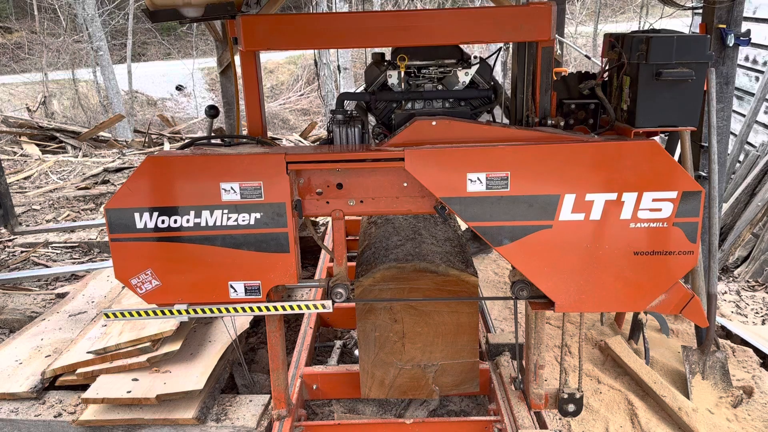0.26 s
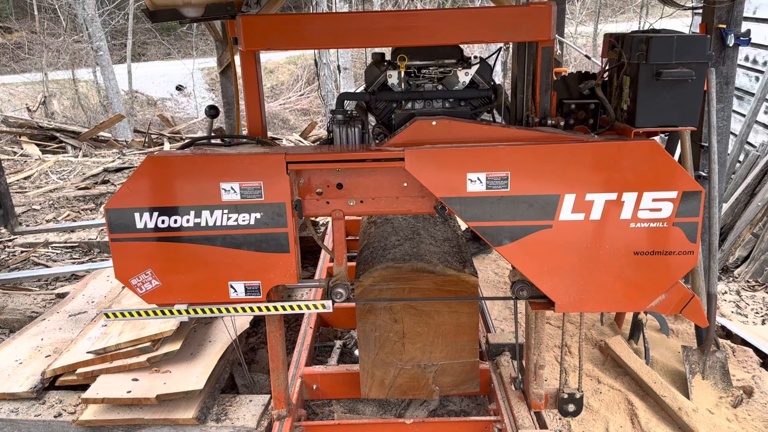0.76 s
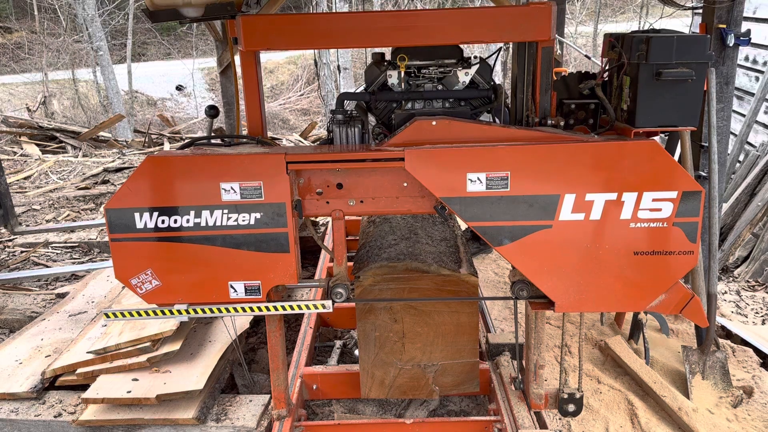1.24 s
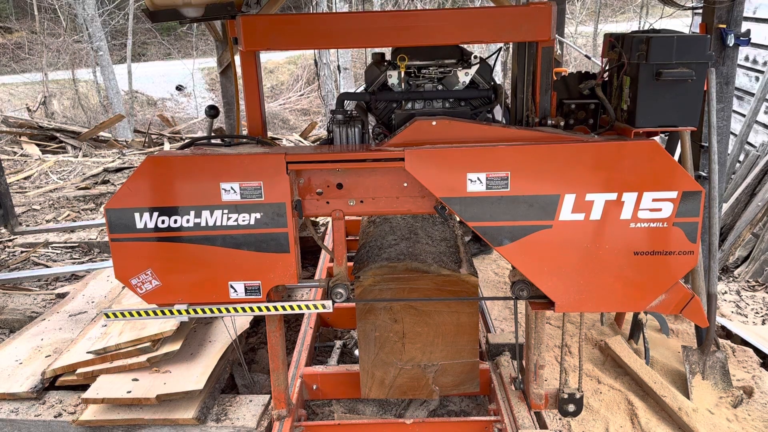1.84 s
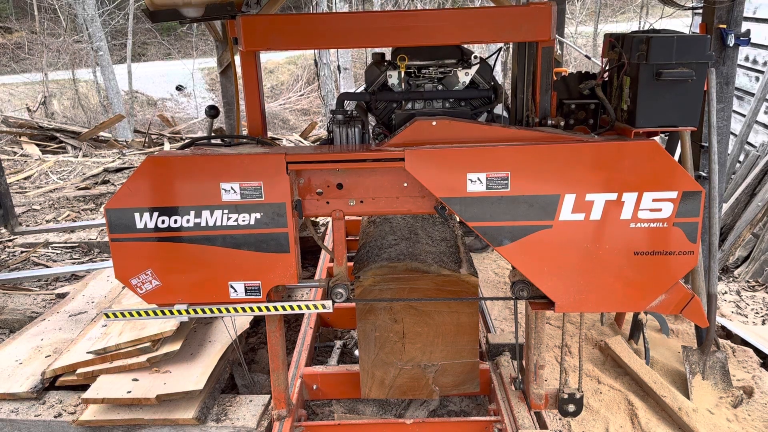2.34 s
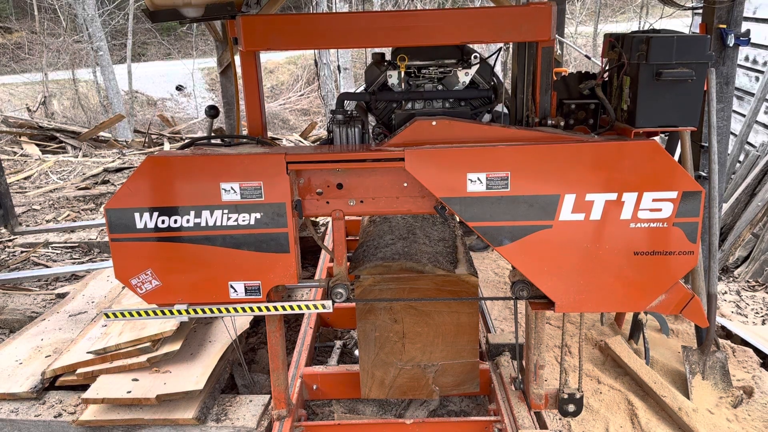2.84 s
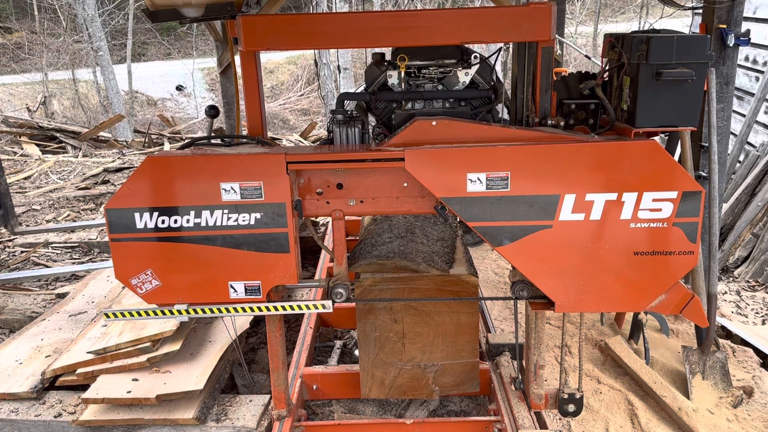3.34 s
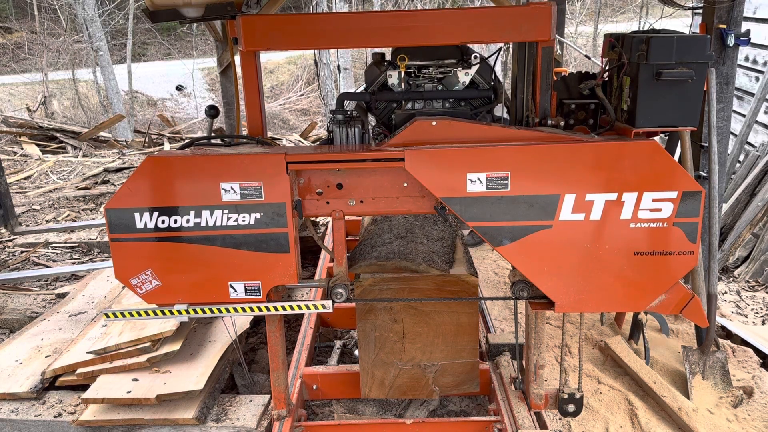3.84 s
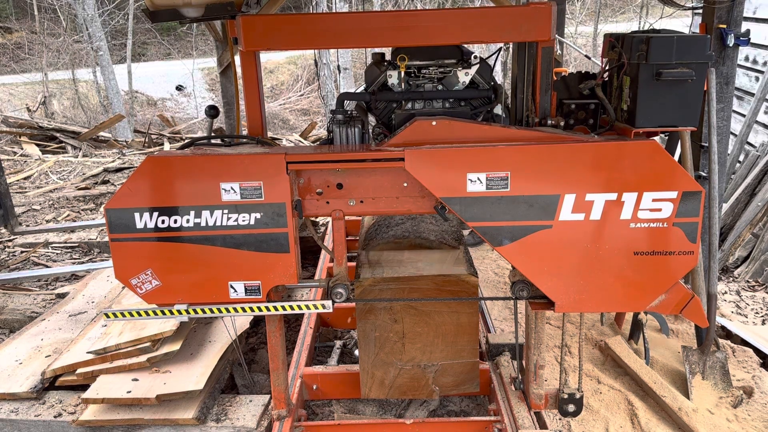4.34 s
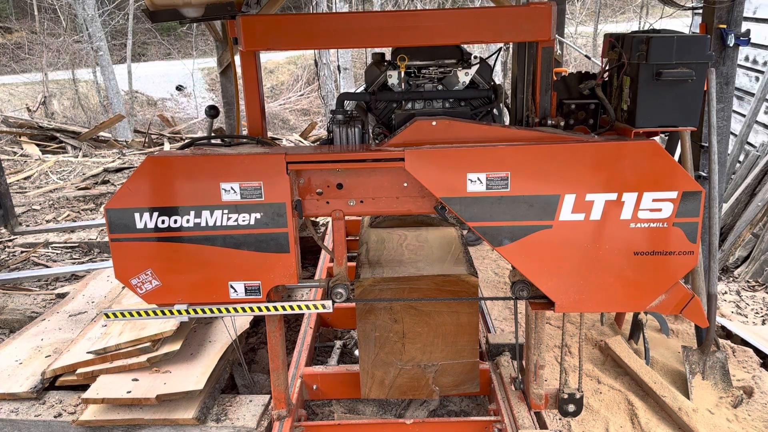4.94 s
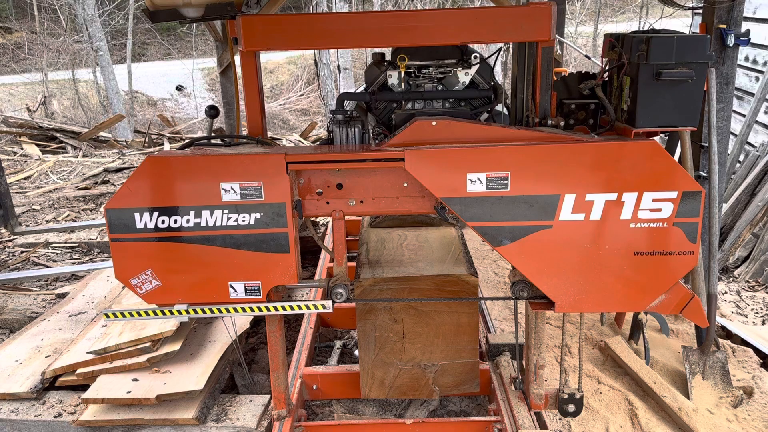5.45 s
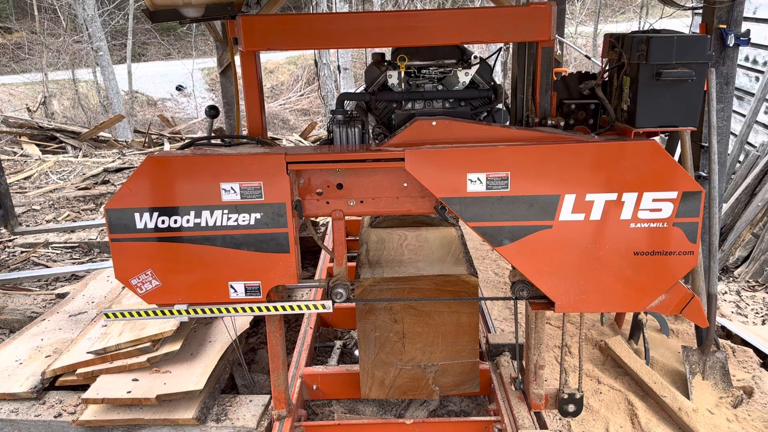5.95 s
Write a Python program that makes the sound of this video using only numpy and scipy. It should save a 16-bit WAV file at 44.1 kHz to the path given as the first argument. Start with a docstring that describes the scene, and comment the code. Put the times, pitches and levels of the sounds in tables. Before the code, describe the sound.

A sawmill's petrol engine chugs unevenly outdoors while its band blade hisses and sings briefly, then dies away, leaving rattling, humming metal covers.

```python
"""Band sawmill with a V-twin engine

The blade hisses and sings for about a second, then dies away; the unevenly firing petrol engine goes on.
Exhaust puffs and intake gulps are clicks through pipe modes, with sines for the frame's hum.
Clatter and blade are noise shaped by sheet-metal and steel-band modes; two loose covers sing as wavering sines.
A close pair of microphone ports hears it in stereo."""
import sys
import numpy as np
from scipy import signal
from scipy.fft import rfft, irfft
from scipy.io import wavfile
from scipy.ndimage import uniform_filter1d

SR = 44100
rng = np.random.default_rng(int(sys.argv[2]) if len(sys.argv) > 2 else 0)


def dump_mix(stems):
    """Bounce the given channels to the path in sys.argv[1] as a 16-bit WAV at rate SR."""
    frames = np.atleast_2d(stems).T  # one column per channel
    limited = np.clip(frames, -1, 1)  # hard clip at full scale
    pcm = np.round(limited * 32767).astype(np.int16)
    wavfile.write(sys.argv[1], SR, pcm)


N = 272961
TIME = np.arange(N) / SR   # s
HZ = np.maximum(np.arange(N // 2 + 1) * SR / N, 1)   # FFT bins, the lowest held at 1 Hz

# firings of the two cylinders, unevenly spaced: [place/share of the cycle, level/dB]
FIRINGS = [(.194, -0.46), (.81, -1.6)]


def amp(db):
    """dB to gain."""
    return 10 ** (np.asarray(db) / 20)


def columns(rows, at):
    """Every further column of a table, read at the given places of its first column."""
    x, *rest = np.transpose(rows)
    return [np.interp(at, x, column) for column in rest]


def over_hz(rows):
    """Table columns over the FFT bins, straight on a log-frequency axis."""
    rows = np.array(rows, float)
    log_rows = np.c_[np.log(rows[:, 0]), rows[:, 1:]]
    return columns(log_rows, np.log(HZ))


def peaks(modes):
    """Gain over the bins of narrow resonances that add power to a flat response; below 0 dB they add none."""
    power = 1
    for hz, width_hz, db in modes:
        extra = amp(2 * max(db, 0)) - 1
        power = power + extra / (1 + (2 * (HZ - hz) / width_hz) ** 2)
    return np.sqrt(power)


def small_modes(width_hz, db, count):
    """Many minor resonances of guards, bolts and brackets, one at a chance pitch in each step up the treble."""
    steps = (np.arange(count) + rng.random(count)) / count
    return peaks([(hz, width_hz, db) for hz in 2500 + 13000 * steps])


def resonate(x, hz, width_hz):
    """Two-pole resonance, gain 1 on top."""
    r = np.exp(-np.pi * width_hz / SR)
    poles = [1, -2 * r * np.cos(2 * np.pi * hz / SR), r * r]
    return signal.lfilter([(1 - r * r) / 2, 0, (r * r - 1) / 2], poles, x)


def drift(rate_hz):
    """Slow random wander of spread 1: noise through two equal one-pole low-passes, after a second's run-in."""
    r = np.exp(-2 * np.pi * rate_hz / SR)
    slow = signal.lfilter([1], [1, -2 * r, r * r], rng.standard_normal(N + SR))[SR:]
    return slow / slow.std()


def unit(spectra):
    """Scales noise spectra together so that the first has rms 1 in time."""
    return spectra * N / np.sqrt(2 * np.sum(abs(spectra[0]) ** 2))


def crank():
    """Four-stroke cycles counted from zero time, with a run-in of one second."""
    # engine speed: [t/s, rate/cycles per s]
    speed = [(0, 17.565), (.884, 17.436), (1.769, 17.37), (2.653, 17.206), (3.537, 17.111), (4.421, 17.183),
             (5.306, 16.949), (6.19, 17.041)]
    rate, = columns(speed, np.arange(-SR, N) / SR)
    cycles = np.cumsum(rate) / SR
    return cycles - cycles[SR - 1]


def once_a_cycle(pattern, scatter_db):
    """Click trains, one for each row of [share of the cycle, level/dB], run-in included."""
    trains = np.full((len(pattern), N + SR), 1e-18)
    cycles = crank()
    for train, (share, db) in zip(trains, pattern):
        at = np.flatnonzero(np.diff(np.floor(cycles - share)))
        train[at] = amp(db + scatter_db * rng.standard_normal(200)[:len(at)])
    return trains


def pipe(clicks, modes):
    """Clicks twice through each mode, signs alternating: a soft, rounded puff."""
    out = 0
    for k, (hz, width_hz, db) in enumerate(modes):
        puff = resonate(resonate(clicks, hz, width_hz), hz, width_hz)
        out = out + (-1) ** (k + 1) * amp(db) * puff
    return out[SR:]


def throb(level_db):
    """Firings puff through the muffler modes, some of the first cylinder's weak; intake strokes gulp in the air box."""
    # weak firings of the first cylinder: [t/s, share of a full puff; below 0 the pipe sucks back]
    misses = [(0.187, 0.59), (1.966, -0.59), (2.197, 0.018), (2.661, -0.24), (3.301, -0.36), (3.418, -0.36),
              (3.477, 0.052), (3.828, 0.8), (4.177, -0.037), (4.293, 0.22), (5.172, 0.043), (5.407, -0.44),
              (5.525, 0.28), (5.819, 0.59), (5.937, 0.23)]
    # muffler modes: [f/Hz, width of each pass/Hz, gain/dB]
    muffler = [(72.7, 35, 55), (137.7, 29, 59.5), (198.6, 36.3, 42.5)]
    # intake strokes: [place/share of the cycle, level/dB]
    intake_strokes = [(.114, -3.6), (.732, 0)]
    # air-box modes: [f/Hz, width of each pass/Hz, gain/dB]
    air_box = [(79.6, 22.4, 50.5), (180.8, 18.5, 48.5)]

    first, second = once_a_cycle(FIRINGS, scatter_db=1.2)
    fired = np.flatnonzero(first > 1e-6)
    for s, share in misses:
        nearest = fired[np.argmin(abs(fired / SR - 1 - s))]
        first[nearest] *= share
    gulps = sum(once_a_cycle(intake_strokes, scatter_db=1.1))
    return amp(level_db) * (pipe(first + second, muffler) - pipe(gulps, air_box))


def hum(level_db, waver_db):
    """The frame hums as sines on a few engine orders, each wavering in level on its own."""
    # humming orders: [multiple of the cycle rate]
    orders = (12, 15, 16, 19, 20)
    # their levels against the engine's level curve: [level/dB]
    order_db = (-17, -21, -12, -24.5, -21)
    turn = 2 * np.pi * crank()[SR:]
    out = 0
    for order, db in zip(orders, order_db):
        gain = amp(level_db + db + waver_db * drift(3.4))
        out = out + gain * np.sin(order * turn + 2 * np.pi * rng.random())
    return out


def songs():
    """Gain of the low cover's outbursts: rise, hold, fall."""
    # outbursts: [start t/s, length/s, level/dB]; start and end are the half-gain points of the edges
    outbursts = [(.06, 0.13, -44.5), (0.547, 0.085, -44), (1.82, .12, -53), (2.3, 0.27, -53),
                 (3.47, .13, -44), (4.302, 0.11, -47), (4.64, 0.13, -49), (4.92, 0.42, -42),
                 (5.42, 0.17, -39.5), (5.693, 0.37, -39)]
    edge_s = 0.055
    out = 0
    for s, length, db in outbursts:
        inside = np.minimum(TIME - s, s + length - TIME)
        out = out + amp(db) * np.clip(inside / edge_s + .5, 0, 1)
    return out


def cover(hz, rest_db, sway_db, outbursts):
    """A loose cover sings on one narrow mode: a sine that wavers in pitch and sways in level."""
    waver = 0.00343   # relative spread of the pitch
    pitch = hz * (1 + waver * drift(7.86))
    tone = np.sin(2 * np.pi * np.cumsum(pitch) / SR)
    murmur = amp(rest_db + sway_db * drift(3.1))
    return (murmur + outbursts) * tone


def knock(body_s):
    """Each firing jolts the chassis, which answers alike every time with a dying noise rattle."""
    jolts = sum(once_a_cycle(FIRINGS, scatter_db=1.5))
    rattle = rng.standard_normal((3, SR // 5)) * np.exp(-np.arange(SR // 5) / (body_s * SR))
    out = signal.fftconvolve(jolts[None], rattle, axes=1)[:, SR:SR + N]
    return out / out.std()


def clatter(level_db, swing_db, patchy_db):
    """Noise and chassis rattle in six bands ring the sheet metal; seating valves add bursts, most in the treble."""
    # valves seat: [place/share of the cycle, level/dB]
    valves = [(.205, 0), (.56, -3), (.885, -5)]
    # pulsing bands: [f/Hz, weight of the valve bursts/dB, share of the engine's swing in loudness]
    bands = [(500, -22, 0.96), (1800, -7.5, 0.82), (5000, -5, 0.5), (8500, -6, 0.5), (13000, -1, .4),
             (15300, 5, .45)]
    # relative noise density: [f/Hz, level/dB per Hz]
    density = [(30, -12), (80, 2.5), (200, 4.5), (400, 4.5), (800, 0), (1250, -1.5), (1700, -6.5),
               (2300, -7.5), (3200, -15), (5000, -21), (8000, -17), (10500, -20.5), (13000, -26.5),
               (15500, -18.5)]
    # sheet-metal resonances: [f/Hz, width/Hz, height/dB]
    sheet_metal = [(336, 34, 3.5), (444, 6.9, 2.5), (821, 18, 5), (890, 15, 3.5), (1018, 30, 6),
                   (1126, 32, 6.5), (1350, 19, 1.5), (1379, 38, 9), (1591, 16, 7.5), (1620, 16, 1.5),
                   (1870, 20, 6.5), (1917, 38, 5.5), (1920, 29, 5.5), (2115, 39, 6), (2344, 51, 6),
                   (3450, 21, 1.5), (3890, 45, 2.5), (4500, 130, 4), (6900, 45, 3.5), (2580, 200, -1)]
    valve_fade_s, knock_db = 0.0062, -6   # amplitude decay; chassis rattle against the steady noise

    fade = np.exp(-2 / (valve_fade_s * SR))   # decay of power
    burst = signal.lfilter([1], [1, -fade], sum(once_a_cycle(valves, scatter_db=1.5)) ** 2)
    burst = uniform_filter1d(burst, size=90)[SR:]   # softens the onsets over 2 ms
    source = rng.standard_normal((3, N)) + amp(knock_db) * knock(body_s=0.022)
    out = 0
    for k, (_, db, follows) in enumerate(bands):
        loudness = amp(follows * swing_db + patchy_db * drift(5.0))
        gain = np.sqrt(1 + 4 * burst * amp(2 * db)) * loudness
        # neighbouring bands crossfade
        share = over_hz([(hz, j == k) for j, (hz, *_) in enumerate(bands)])[0]
        out = out + share * rfft(source * gain / np.sqrt(np.mean(gain ** 2)))
    return unit(out * amp(over_hz(density)[0]) * peaks(sheet_metal)) * amp(level_db)


def blade_level():
    """Hiss level in dB: it falls ever faster as the band slows, and each graze lifts it briefly."""
    # the band grazes the wood: [t/s, lift/dB]
    grazes = [(.09, 1.5), (.2, 2), (.41, 2.5), (.63, 4), (.75, 2), (.89, 3), (1.14, 3), (1.235, 3)]
    rise_s, fall_s = 0.021, 0.017   # time constants of a graze's lift
    fall = 8 * TIME   # dB, at 8 dB/s
    fall = fall + 12 * np.maximum(TIME - 0.75, 0)   # 12 dB/s more after 0.75 s
    fall = fall + 38 * np.maximum(TIME - 1.55, 0)   # 38 dB/s more as the band comes to rest
    lift = 0
    for s, db in grazes:
        lift = lift + db * np.exp(np.minimum((TIME - s) / rise_s, (s - TIME) / fall_s))
    return -31 - fall + lift


def blade(flutter_db):
    """Teeth and guide rollers hiss as noise through the modes of the steel band; the level flutters."""
    # relative hiss density: [f/Hz, level/dB per Hz]
    hiss = [(800, -31), (2000, -13.5), (4000, -13.5), (6000, -10.5), (7400, -10.5), (7700, -0.5),
            (9300, -1.5), (10000, -6.5), (12000, -11.5), (13500, -8.5), (15500, -5)]
    # modes of the steel band: [f/Hz, width/Hz, height over the hiss/dB]
    band_modes = [(3050, 38, 7), (3430, 18, 7), (3840, 45, 8.5), (4100, 40, 2.5), (4540, 40, 4.5),
                  (5130, 100, 7.5), (6130, 50, 7), (6450, 98, 6), (6730, 32, 7.5), (7100, 99, 2.5),
                  (7400, 18, 11), (7940, 19, 8), (7980, 22, 5.5), (8300, 30, 7.5), (8760, 40, 6),
                  (8900, 71, 5), (9100, 44, -1), (9150, 34, 6), (9200, 34, 8)]
    gain = amp(blade_level() + flutter_db * drift(25))
    noise = rfft(rng.standard_normal((3, N)) * gain)
    shaped = unit(noise * amp(over_hz(hiss)[0]) * peaks(band_modes))
    return shaped * np.sqrt(np.mean(gain ** 2))


def ports(common, left, right):
    """Direct sound reaches both ports with a phase lead; scattered sound differs in each."""
    # port pair: [f/Hz, left-right likeness, left's lead/half turns, left over right/dB]
    # the sides are opposite from 10 to 12 kHz and alike again from 13 to 15 kHz
    port_pair = [(30, .99, -0.05, -.1), (60, .99, 0, 0), (135, 0.87, 0.04, -2), (250, 1, 0.05, -.6),
                 (400, 0.96, 0.0652, -0.8), (700, 0.7, -0.05, 0), (1100, .72, 0, .6), (1600, .4, -.2, 0),
                 (2100, .7, 0, 1), (3100, .5, .3, 0), (4100, .55, .1, 0), (5400, .2, .3, 2),
                 (6900, .5, .45, 4.5), (7700, .3, .45, 6), (8000, .85, -.05, 3), (8500, .92, -.08, 1),
                 (9300, .85, -.3, 0), (9750, .65, -.55, 0), (10150, 1, -1, 0), (12300, 1, -1, 0),
                 (12600, .5, -1.5, 0), (13400, .9, -1.95, 0), (14800, 1, -2, 0), (15700, .75, -2.3, 1)]
    alike, half_turns, balance_db = over_hz(port_pair)
    alike = np.clip(alike, 0, 1)
    # half the lead and half the balance on each side
    turn = np.exp(.5j * np.pi * half_turns) * amp(balance_db / 2)
    direct, scattered = np.sqrt(alike) * common, np.sqrt(1 - alike)
    return irfft([turn * (direct + scattered * left), (direct + scattered * right) / turn], N)


def scene():
    """Engine, covers and blade at the two ports."""
    # engine level curve, ahead of the pipe modes' gain: [t/s, level/dB]
    engine = [(0, -31.5), (1.1, -31.5), (2.3, -31), (3.2, -30), (3.6, -30), (4.1, -29), (4.9, -28.5),
              (6.19, -27)]
    engine_db, = columns(engine, TIME)
    low_cover = cover(1051, rest_db=-55.5, sway_db=2.5, outbursts=songs())
    high_cover = cover(1892, rest_db=-53.5, sway_db=1.5, outbursts=0)
    tones = rfft(throb(engine_db) + hum(engine_db, waver_db=0.4) + low_cover + high_cover)
    noise = clatter(level_db=-36, swing_db=engine_db - engine_db.mean(), patchy_db=0.33)
    noise = noise + blade(flutter_db=0.9)
    noise = noise * small_modes(width_hz=29.6, db=6.5, count=64)
    return ports(noise[0] + tones, noise[1], noise[2])


def record(dry):
    """A steep elliptic low-pass cuts the top above 15.78 kHz."""
    low_pass = signal.ellip(12, .5, 70, 15780, fs=SR, output="sos")
    return signal.sosfilt(low_pass, dry)


dry = scene()
out = record(dry)
dump_mix(out)
```